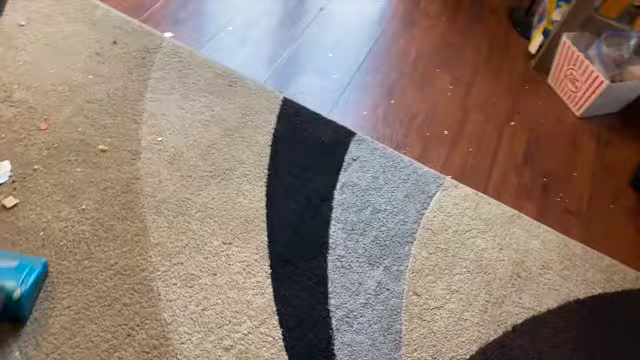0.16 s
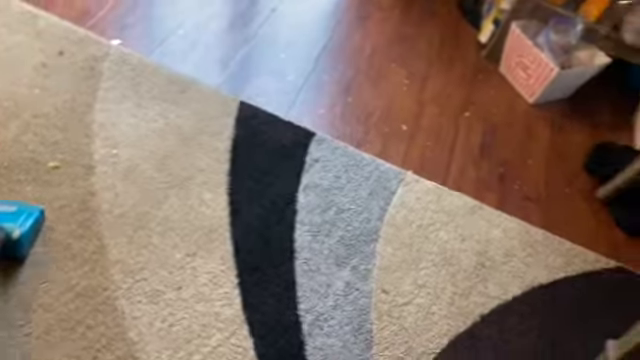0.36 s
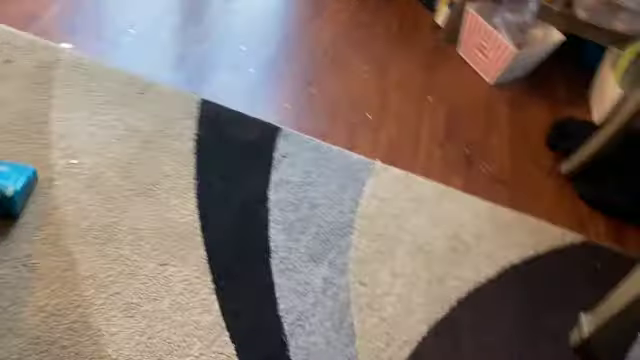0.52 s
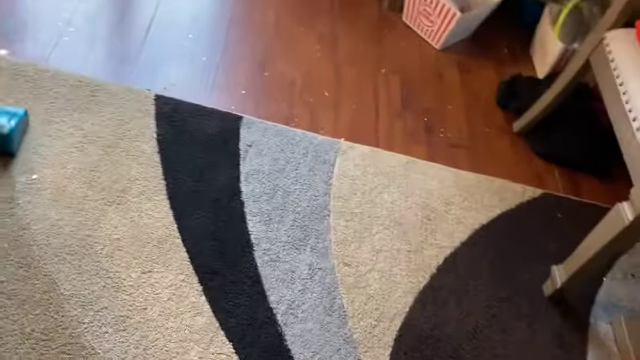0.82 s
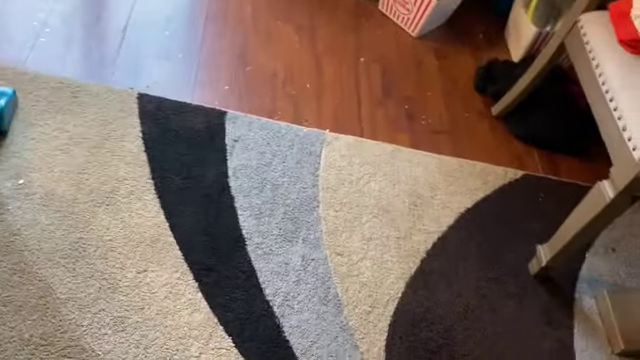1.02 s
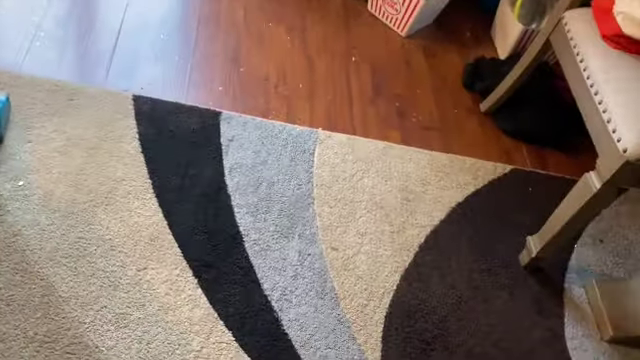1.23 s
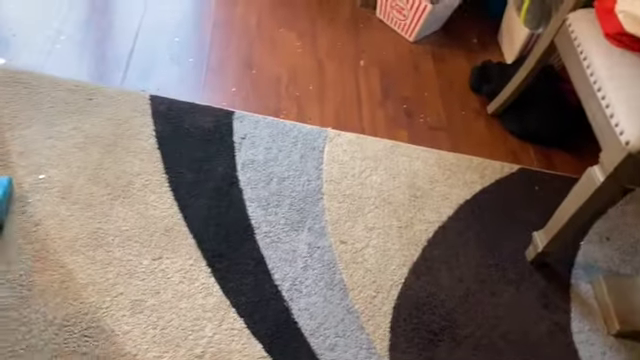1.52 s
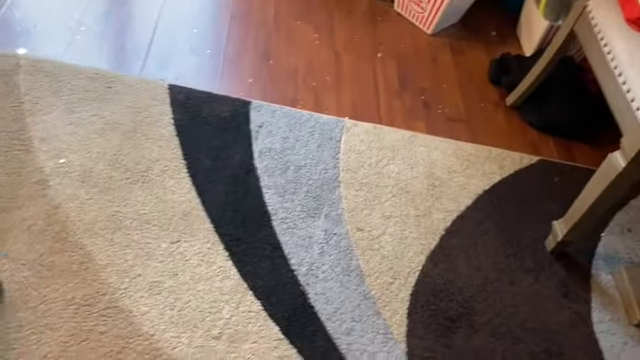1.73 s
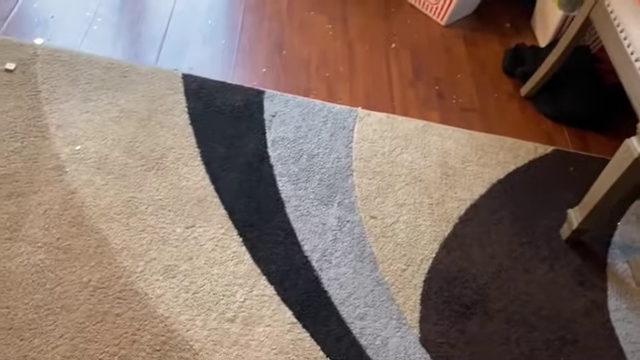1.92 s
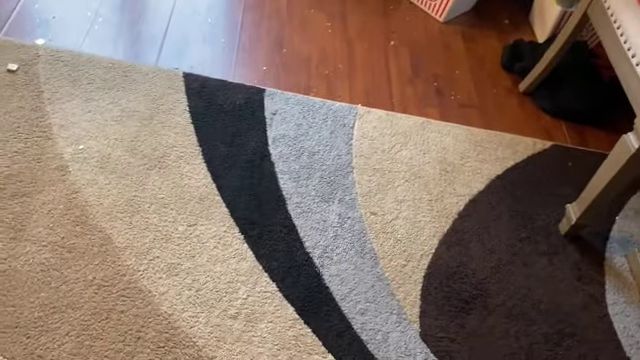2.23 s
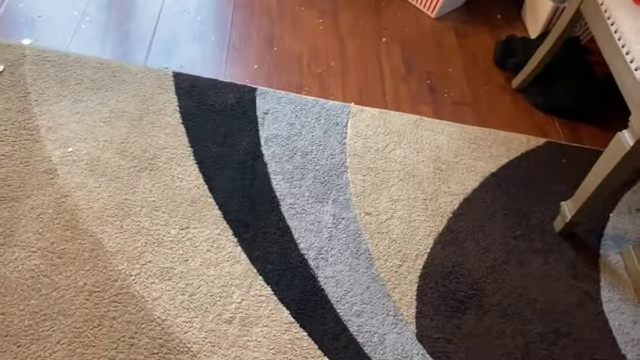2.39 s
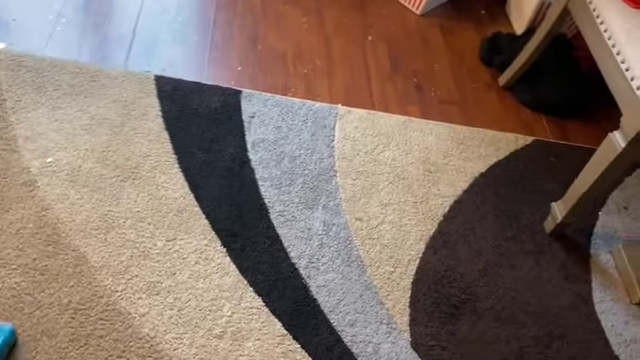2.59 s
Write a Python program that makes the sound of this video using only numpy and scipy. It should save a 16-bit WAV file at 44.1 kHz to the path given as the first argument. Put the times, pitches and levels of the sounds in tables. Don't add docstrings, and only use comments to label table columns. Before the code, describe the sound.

A vacuum cleaner runs on a rug, close to a phone in a room with short reverberation. Air hiss, soft rug rumble and a low hum begin at once. From about 0.2 to 1.1 seconds crumbs crackle and rattle densely in the plastic duct, with dull hollow knocks. Uneven bursts continue until about 2.1, then mostly quieter air and hum with a few light ticks until about 2.75.

```python
import sys
import numpy as np
from scipy import signal
from scipy.fft import rfft, irfft, next_fast_len
from scipy.io import wavfile
from scipy.ndimage import uniform_filter1d

SR = 44100
rng = np.random.default_rng(int(sys.argv[2]) if len(sys.argv) > 2 else 0)


def linear_from_db(decibels):
    return 10 ** (np.asarray(decibels, float) / 20)


def transcribe(u):
    v = np.clip(np.atleast_2d(u).T, -1, 1)
    q = np.round(v * 32767).astype(np.int16)
    wavfile.write(sys.argv[1], SR, q)


N = 121275

# start_s, suction_db, rug_rumble_db
AIR_FLOW = [(0, -31.5, -33), (.3, -29.5, -33), (.6, -29.5, -39.5), (1, -31, -40), (1.2, -36.5, -40),
            (1.45, -32, -40.5), (1.95, -36, -37), (2.2, -40.5, -39.5), (2.35, -38, -40.5), (2.55, -38, -39),
            (2.75, -33.5, -37)]


def unit(x):
    return x / np.sqrt(np.mean(x ** 2))


def curve(table, order):
    rows = np.array(table)
    return np.interp(np.arange(N) / SR, rows[:, 0], rows[:, order])


def over_hz(table, hz, order=1):
    rows = np.array(table)
    return np.interp(np.log(hz + 1), np.log(rows[:, 0]), rows[:, order])


def walk(rate_hz):
    hold = int(SR / rate_hz)
    steps = np.repeat(rng.standard_normal(N // hold + 1), hold)
    smooth = uniform_filter1d(uniform_filter1d(steps, hold), hold)
    return unit(smooth[:N])


def band(x, hz, width_hz):
    return signal.lfilter(*signal.iirpeak(min(hz, SR / 3), hz / width_hz, SR), x)


def ring(x, modes):
    out = 0
    for hz, db, t60_s in modes:
        pole = np.exp(2j * np.pi * hz / SR - np.log(1000) / (max(t60_s, .003) * SR))
        out = out + linear_from_db(db) * signal.lfilter([1], [1, -pole], x).imag
    return out


def add_hit(out, start_s, hit):
    first = int(start_s * SR)
    out[first:first + len(hit)] += hit


def crumbs():
    # start_s, peak_db, colour_hz
    crumb_hits = [(0.188, -11, 3800), (0.2332, -6, 5750), (0.3468, -10, 6477), (0.361, -28, 4340),
                  (0.3712, -3.5, 5900), (0.3924, 0, 5760), (0.402, -5, 6630), (0.459, -1.5, 6700),
                  (0.52, -3.5, 5890), (0.575, -9, 4960), (0.616, -1, 4540), (0.7094, -13, 4603),
                  (0.7265, -7, 2010), (0.7378, -4.5, 5770), (0.8186, -7.5, 4930), (0.835, -5, 5900),
                  (0.8579, -6, 2150), (0.9194, -4.5, 2030), (0.9946, -20, 7230), (1.0244, -8, 2200),
                  (1.1336, -13, 6020),
                  (1.259, -18, 6590), (1.2705, -28, 7210), (1.3533, -5, 5340), (1.4163, -12.5, 6210),
            (1.4364, -9.5, 4070), (1.4818, -5, 6400), (1.53, -5.5, 6460), (1.6095, -10.5, 3133),
            (1.69, -8, 6100), (1.7846, -6, 6084), (1.8285, -5.5, 4700), (1.901, -8, 2540),
            (1.924, -16, 6860), (1.941, -5.5, 6070), (2.023, -19, 3290), (2.072, -9.5, 4300),
            (2.1185, -11, 5800), (2.163, -14.5, 6800), (2.4005, -15, 3360),
                  (0.0662, -16, 5050), (0.1975, -11, 1940), (0.381, -3.5, 5000), (0.446, -8, 6000),
             (0.477, -18, 4200), (0.588, -13, 3000), (0.8033, -15, 5670), (1.113, -21, 5850),
             (1.307, -14.5, 5950), (1.3314, -14, 5910), (1.4852, -10, 4620), (1.559, -13, 5500),
             (1.5848, -22, 7000), (1.6446, -20, 6860), (1.795, -14, 4500), (1.807, -9, 5500),
             (1.848, -8.5, 3970), (1.857, -6.5, 3500), (2.014, -21, 4240), (2.0336, -18, 7140),
             (2.057, -12, 6620), (2.2706, -17, 4490), (2.5213, -17, 6360), (2.5451, -18.5, 5894),
             (2.5917, -18, 1570), (2.7303, -12, 7000)]
    out, t = np.zeros(N + 1024), np.arange(1024) / SR
    for start_s, db, hz in crumb_hits:
        tick = rng.standard_normal(len(t)) * np.exp(-t / 0.002) * np.clip(t / 0.00068, 0, 1)
        hit = band(tick, hz, hz / 5.6)
        hit = hit + 0.45 * band(tick, 5100, 6000) + 0.16 * band(tick, 10400, 5000)
        add_hit(out, start_s, linear_from_db(db - 4) * hit / np.abs(hit).max())
    return out[:N]


def specks():
    # start_s, peak_db
    speck_hits = [(0.067, -27), (0.187, -9), (0.235, -16), (0.251, -19), (0.349, -30), (0.374, -23),
                  (0.598, -14), (0.615, -12.5), (0.664, -16), (0.7045, -24), (0.712, -23), (0.9252, -17),
                  (1.069, -9.5), (1.079, -10.5), (1.209, -20), (1.2773, -33), (1.3566, -16), (1.48, -11.5),
                  (1.49, -7), (1.5656, -20), (1.589, -21), (1.644, -16.5), (1.785, -22), (1.8063, -20),
                  (1.8293, -16), (1.845, -12), (1.855, -13), (1.9257, -19), (2.034, -22), (2.056, -20),
                  (2.593, -21), (2.732, -18.5), (2.74, -24)]
    speck_hz, width_hz, decay_s = 9300, 2800, 0.001
    out, t = np.zeros(N + 256), np.arange(256) / SR
    for start_s, db in speck_hits:
        click = rng.standard_normal(len(t)) * np.exp(-t / decay_s)
        hit = band(band(click, speck_hz, width_hz), speck_hz, width_hz)
        add_hit(out, start_s, linear_from_db(db + 4) * hit / np.abs(hit).max())
    return out[:N]


def grains(per_s, spread_db, smear_s):
    sizes_db = spread_db * np.minimum(rng.exponential(size=N), 3)
    hits = (rng.random(N) < per_s / SR) * linear_from_db(sizes_db)
    envelope = signal.lfilter([1], [1, -np.exp(-1 / (smear_s * SR))], hits)
    return unit(envelope * rng.standard_normal(N))


def duct(per_s, dull_db):
    # pitch_hz, level_db
    parts = [(1300, dull_db), (2300, dull_db), (3400, -5.5), (4600, -2),
             (5900, -1.5), (7200, 2.5), (9000, 0.0), (11000, -3.5)]
    return sum(linear_from_db(db) * unit(band(grains(per_s, 1.7, .0015), hz, hz / 3)) for hz, db in parts) / 2


def grit():
    # start_s, length_s, level_db, dullness_db
    swallowed = [(0.184, 0.12, -32.5, -8), (0.352, 0.065, -23, -4.5), (0.433, 0.088, -25.5, -19),
                 (0.508, 0.076, -30.5, -12), (0.573, 0.058, -22, -2.5), (0.647, 0.027, -26.5, -24),
                 (0.735, 0.037, -28, 1), (0.844, 0.041, -27.5, -1.5), (0.918, 0.033, -25, -1.5),
                 (1.025, 0.03, -24, -4), (1.119, 0.033, -28, -10), (1.254, 0.036, -24, -21),
                 (1.346, 0.043, -27, -12), (0.994, 0.022, -28, 0.5), (1.477, 0.03, -20.5, -14.5),
                 (1.513, 0.074, -37.5, -3.5), (1.599, 0.033, -36, 6.5), (1.78, 0.049, -24, -3.5),
                 (1.826, 0.047, -23.5, -5.5), (1.904, 0.062, -34.5, 5), (2.007, 0.12, -34, -4)]
    grit_per_s, rattle_per_s = 390, 300
    t, bright, dull = np.arange(N) / SR, 0, 0
    for start_s, length_s, db, dull_db in swallowed:
        rise = np.clip((t - start_s) / 0.0057, 0, 1)
        late_s = np.maximum(t - start_s - length_s / 2, 0)
        swell = linear_from_db(db) * rise * np.exp(-late_s ** 2 / (0.37 * length_s) ** 2)
        bright = bright + swell
        dull = dull + swell * linear_from_db(dull_db)
    fine = linear_from_db(curve(AIR_FLOW, order=1) - 3 + 2 * walk(12))
    body_hz = (1086, 1420, 1800, 2550)
    body = sum(unit(band(grains(rattle_per_s, 3.4, 0.0014), hz, hz / 2.0)) for hz in body_hz) / 2.49
    return fine * duct(grit_per_s, -14) + bright * duct(rattle_per_s, -7.0) + dull * body


def knocks():
    # start_s, peak_db, struck_part_hz
    thuds = [(0.194, -22.5, 520), (0.277, -35, 560), (0.369, -22, 417), (0.394, -29, 477),
             (0.461, -22, 482), (0.583, -19, 353), (0.611, -21, 238), (0.74, -22, 412), (0.859, -19.5, 430),
             (0.87, -19, 443), (0.921, -19, 457), (0.933, -22, 540), (0.997, -25, 440), (1.025, -25, 447),
             (1.458, -30, 430), (1.602, -30, 430), (1.785, -23.5, 264.7), (1.83, -25, 418),
             (1.849, -15, 493), (1.899, -24.5, 270), (2.005, -26.5, 490), (2.291, -31, 630),
             (2.45, -35, 544)]
    # pitch_hz, level_db, t60_s
    head_modes = [(241.5, -8.5, 0.093), (286, -5.5, 0.097), (337, -13, 0.047), (432, -2.5, 0.11),
                  (479.5, -3, 0.094), (563.5, -0.5, 0.061), (630, -8, 0.067)]
    out = np.zeros(N + 8192)
    push = np.pad(np.hanning(32) / 16, (0, 8160))
    for start_s, db, hz in thuds:
        add_hit(out, start_s, linear_from_db(db - 1) * band(ring(push, head_modes), hz, hz / 2.6))
    return out[:N]


def motor():
    # start_s, pitch_hz, hum_db, octave_db
    brush_roll = [(0, 110.1, -44, -56), (.17, 107.6, -41, -45), (.21, 107.4, -48, -52),
                  (.33, 108.7, -34.5, -48), (.5, 108.6, -45.5, -57), (.63, 111.1, -54, -43),
                  (.75, 112.4, -47, -47.5), (1.24, 113.1, -44, -44.5), (1.36, 114.3, -46, -59),
                  (1.64, 116.9, -45, -45), (1.7, 110.4, -60, -50), (1.76, 109.7, -45, -45),
                  (1.9, 111.2, -59, -48), (2.15, 109.9, -70, -54.5), (2.3, 108.5, -52.5, -51.5),
                  (2.75, 108.3, -44, -47)]
    # pitch_hz, width_hz, level_db
    fan_lines = [(262.8, 30, -54.5), (485, 94, -48.5), (628.6, 31, -56), (1944, 68, -49), (5030, 33, -61)]
    turn_hz = curve(brush_roll, order=1) * (1 + 0.004 * walk(19.6))
    phase = 2 * np.pi * np.cumsum(turn_hz) / SR
    hum = linear_from_db(curve(brush_roll, order=2) + 3.0 * walk(22)) * np.sin(phase)
    octave = linear_from_db(curve(brush_roll, order=3) + 1.1 * walk(9.4)) * np.sin(2 * phase)
    fan = 0
    for hz, width_hz, db in fan_lines:
        line = unit(band(band(rng.standard_normal(N), hz, width_hz), hz, width_hz))
        fan = fan + linear_from_db(db + curve(AIR_FLOW, order=2) + 37.5) * line
    return np.sqrt(2) * (hum + octave + fan)


def rush(colour, flicker_db):
    hz, out = np.arange(N // 2 + 1) * SR / N, 0
    for centre_hz in 25 * 2 ** (np.arange(28) / 3):
        overlap = np.maximum(1 - 3 * np.abs(np.log2((hz + 1) / centre_hz)), 0) ** .5
        shape = overlap * linear_from_db(over_hz(colour, hz))
        noise = irfft(rfft(rng.standard_normal(N)) * shape, N)
        out = out + noise * linear_from_db(flicker_db * walk(14))
    return unit(out)


def moving_air():
    # pitch_hz, level_db
    hiss_colour = [(700, -13), (1500, 4.5), (2600, -1), (4500, -3.5), (6500, -7), (8500, 3.5), (11000, -8),
                   (12500, 0)]
    # pitch_hz, level_db
    rumble_colour = [(30, -20), (70, -8.5), (180, -7), (270, -1), (480, -3.5), (800, -2), (1300, -7.5),
                     (2200, -17)]
    hiss, rumble = rush(hiss_colour, 3.5), rush(rumble_colour, 3.56)
    hiss_gain = linear_from_db(curve(AIR_FLOW, order=1))
    rumble_gain = linear_from_db(curve(AIR_FLOW, order=2) + 2.0)
    lags = (0, N // 3, 2 * N // 3)
    return [np.roll(hiss, lag) * hiss_gain + np.roll(rumble, lag) * rumble_gain for lag in lags]


def scene():
    # pitch_hz, left_lead_rad, left_right_db, room_share_db
    mic_ports = [(111, .25, 0, -13), (476, 0.5, 3, -1), (1390, 1.43, 1.8, -3), (3000, 0.39, -3.5, -2.5),
                 (7050, 0.5, -1, -5), (8430, 4, 2.5, -4.5), (9930, 4, -0.5, -4.5), (11230, 6, 1, -17)]
    room_t60_s = 0.26
    air = moving_air()
    size = next_fast_len(N + SR)
    hz = np.arange(size // 2 + 1) * SR / size
    parts = rfft(motor() + grit() + crumbs() + specks() + knocks(), size)
    t = np.arange(SR // 2) / SR
    tail = rng.standard_normal((2, len(t))) * linear_from_db(-60 * t / room_t60_s) * np.clip(t / 0.0041, 0, 1)
    tail = tail / np.sqrt(np.sum(tail ** 2, axis=1, keepdims=True))
    walls = rfft(tail, size) * parts + rfft(air[1:], size)
    side = np.array([[.5], [-.5]])
    shadow = linear_from_db(side * over_hz(mic_ports, hz, order=2))
    lag = np.exp(1j * side * over_hz(mic_ports, hz))
    direct = parts + rfft(air[0], size)
    heard = direct + walls * linear_from_db(over_hz(mic_ports, hz, order=3))
    return irfft(shadow * lag * heard, size)[:, :N]


def joint_stereo(dry):
    # start_s, end_s
    plain_spans = [(.168, .198), (.205, .25), (1.07, 1.108), (1.33, 1.375), (1.478, 1.496), (1.633, 1.665),
                   (1.773, 1.806), (1.913, 1.946), (2.262, 2.285), (2.31, 2.36), (2.398, 2.41),
                   (2.586, 2.63)]
    gap_from_hz, gap_to_hz, joint_from_hz, top_hz, step_hz = 7750, 10250, 3430, 11700, 345
    side_drop_db, scatter_db = 7, 3
    frame = dict(fs=SR, window=signal.windows.kaiser_bessel_derived(2048, 4 * np.pi),
                 nperseg=2048, noverlap=1024)
    lead = 117
    mid_side = np.pad([dry[0] + dry[1], dry[0] - dry[1]], ((0, 0), (lead, 0))) / 2
    hz, t, spec = signal.stft(mid_side, **frame)

    def flutter(size):
        return np.round(unit(uniform_filter1d(rng.standard_normal(len(t)), size=size)))

    keep, col = np.ones(spec.shape), hz[:, None]
    for low_hz in np.arange(joint_from_hz, 13000, step_hz):
        rows = (hz >= low_hz) & (hz < low_hz + step_hz)
        db = 10 * np.log10(np.sum(np.abs(spec[:, rows]) ** 2, axis=1) + 1e-18)
        strong = db[0] - db[1] + scatter_db * flutter(size=3) < side_drop_db
        keep[1, rows] = strong & (rng.random(len(t)) > .1)
    below_gap = col < gap_from_hz + 260 * flutter(size=1)
    above_gap = col > gap_to_hz + step_hz * flutter(size=1)
    keep[0] = below_gap | above_gap
    keep[1] *= col < gap_to_hz + 200 + step_hz * flutter(size=2)
    top = col < top_hz + 240 * flutter(size=1)
    joined = signal.istft(spec * (keep * top), **frame)[1][:, lead:N + lead]
    plain = signal.istft(spec * (col < top_hz + 500), **frame)[1][:, lead:N + lead]
    gate, now = 0, np.arange(N) / SR
    for start_s, end_s in plain_spans:
        fade = np.clip(np.minimum(now - start_s, end_s - now) / .012, 0, 1)
        gate = gate + .3 * np.sin(np.pi / 2 * fade) ** 2
    mid, side = joined + gate * (plain - joined)
    return np.array([mid + side, mid - side])


def roll_off(x):
    return signal.sosfilt(signal.butter(12, 13070, fs=SR, output="sos"), x)


def record(dry):
    mix = joint_stereo(dry)
    return roll_off(mix)


dry = scene()
out = record(dry)
transcribe(out)
```